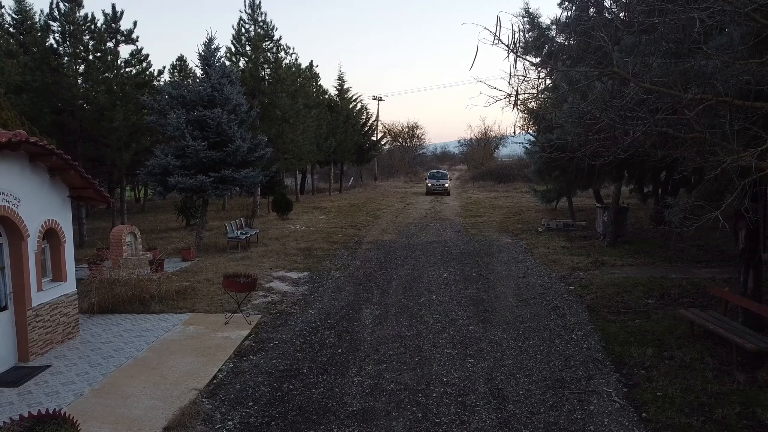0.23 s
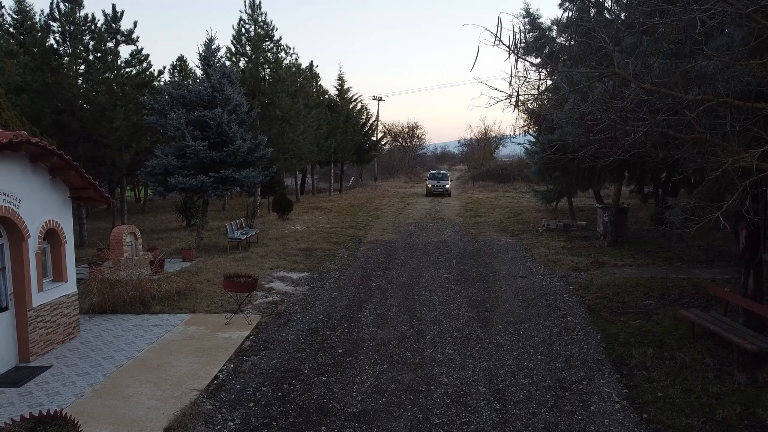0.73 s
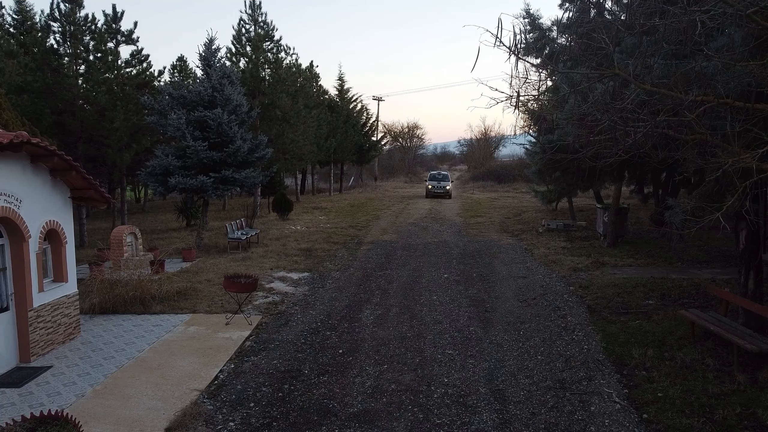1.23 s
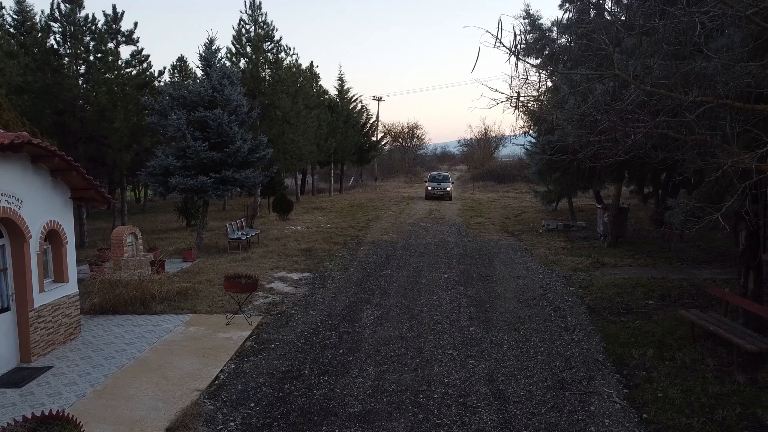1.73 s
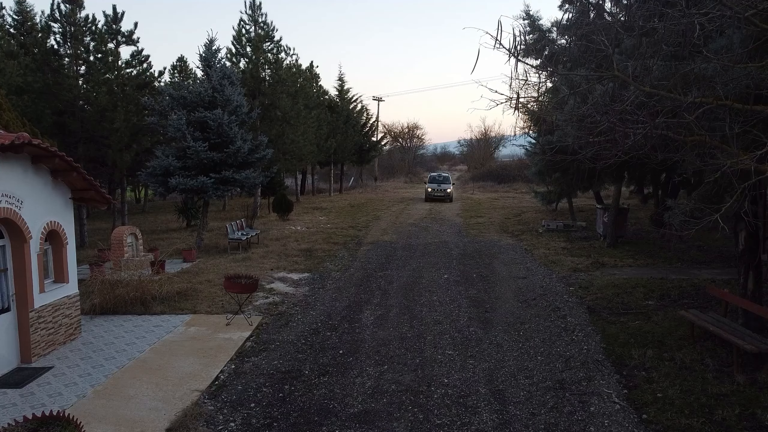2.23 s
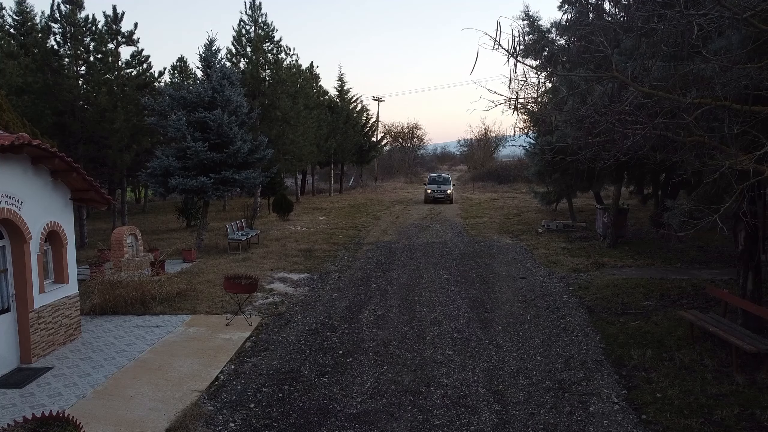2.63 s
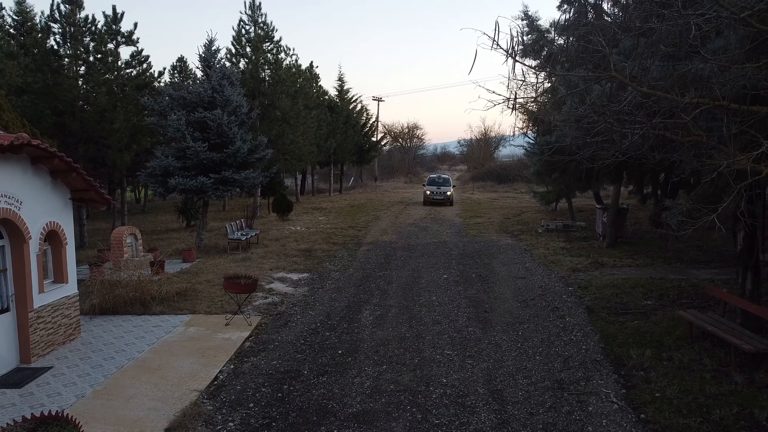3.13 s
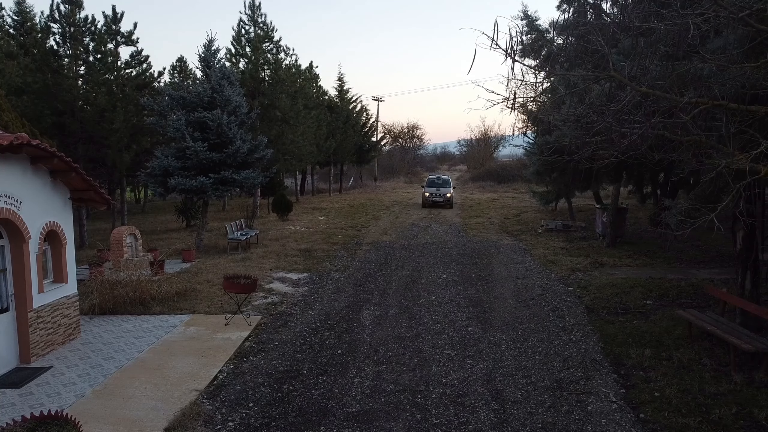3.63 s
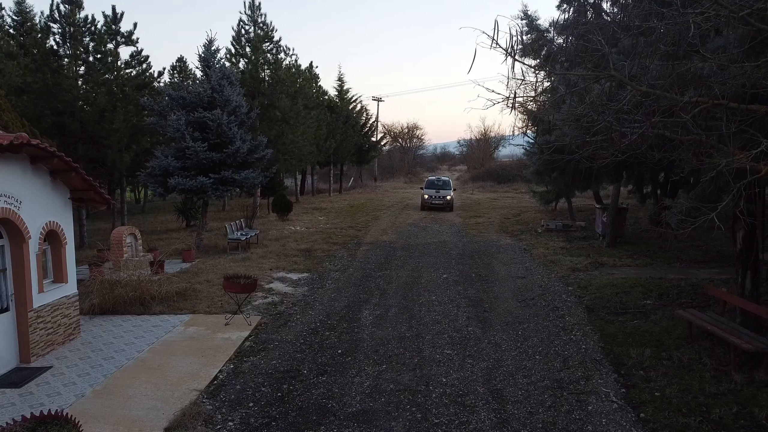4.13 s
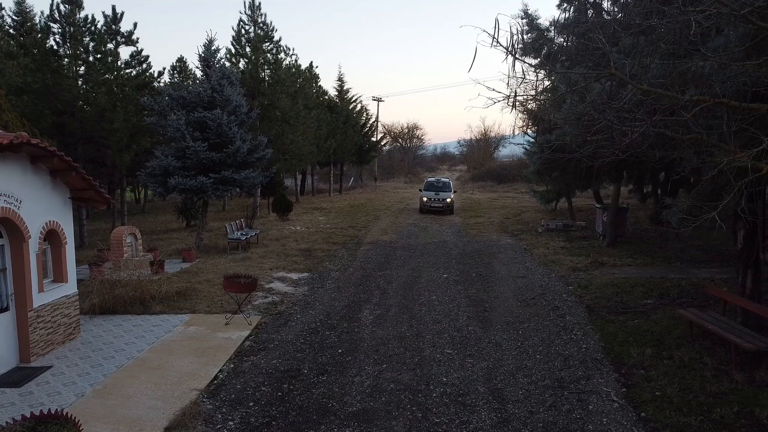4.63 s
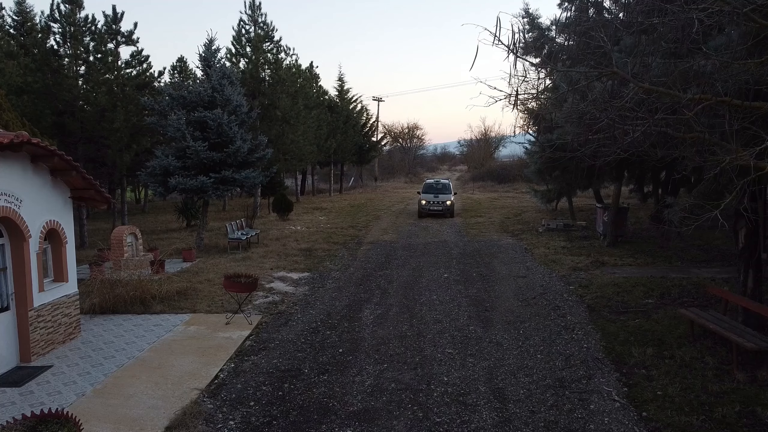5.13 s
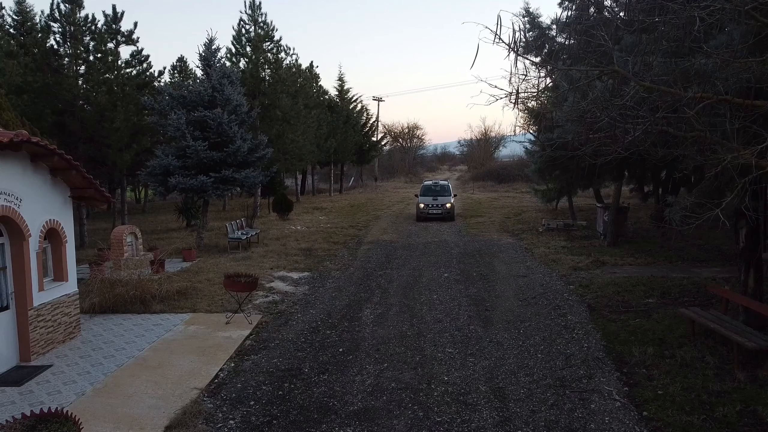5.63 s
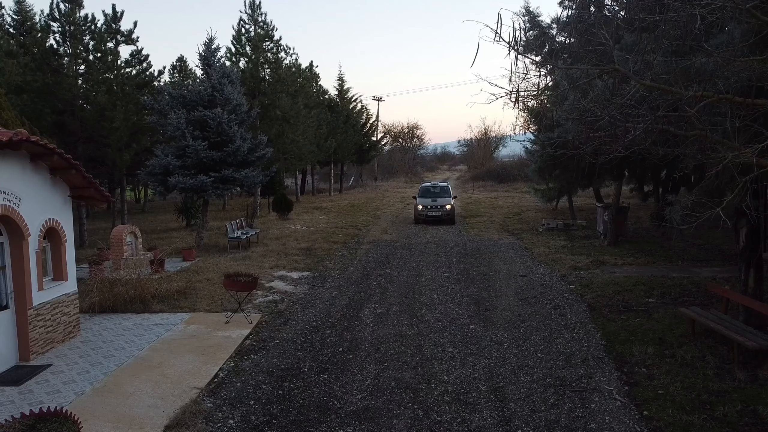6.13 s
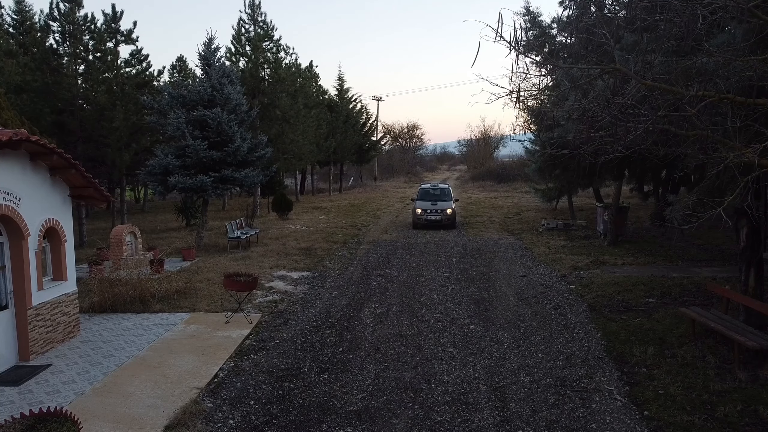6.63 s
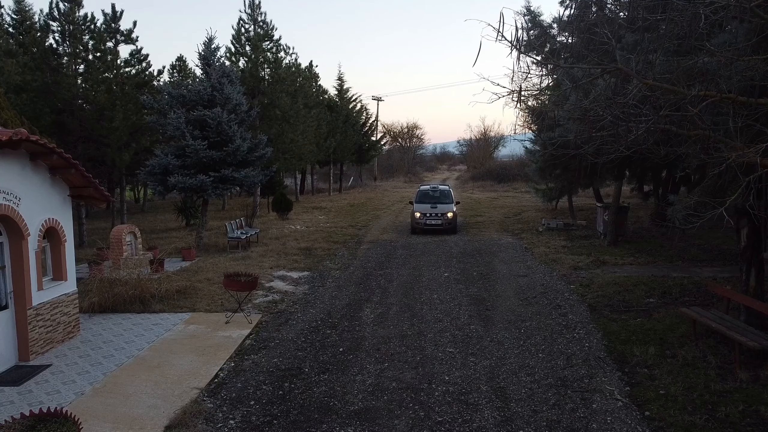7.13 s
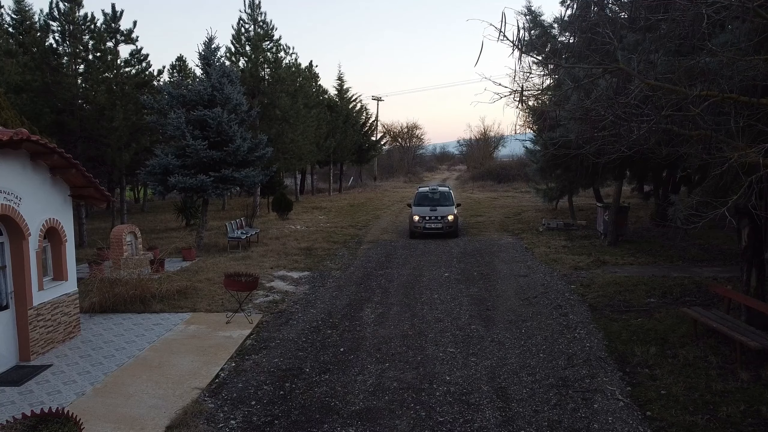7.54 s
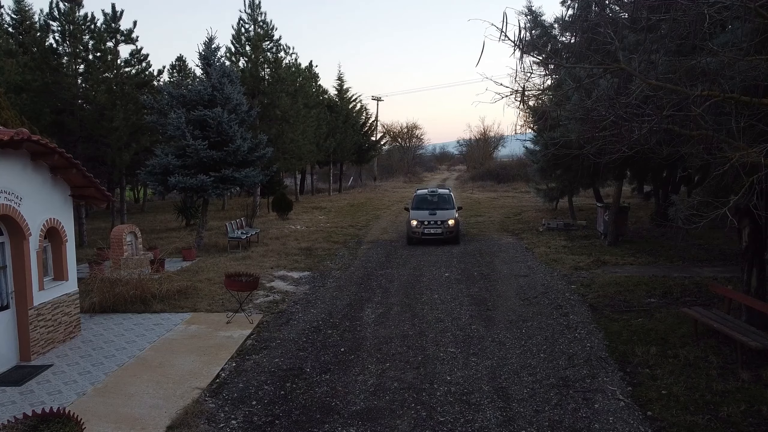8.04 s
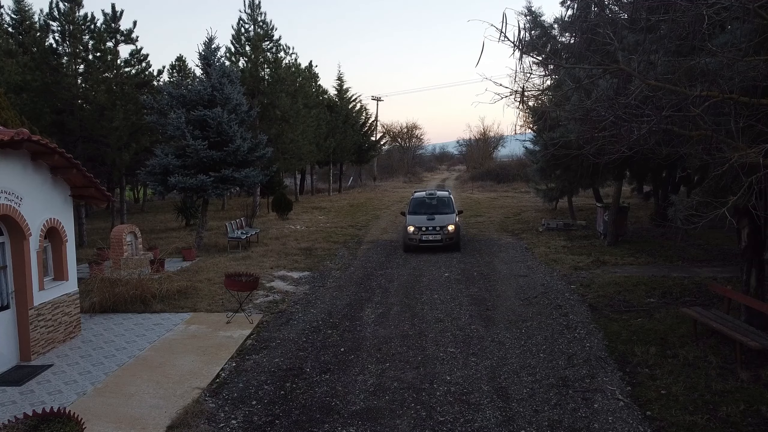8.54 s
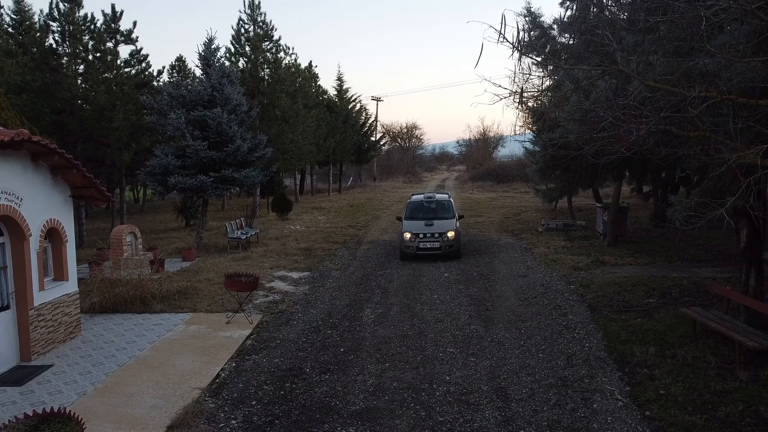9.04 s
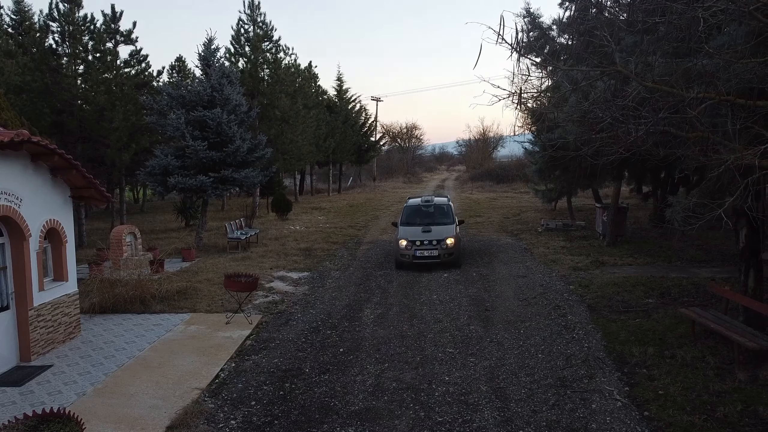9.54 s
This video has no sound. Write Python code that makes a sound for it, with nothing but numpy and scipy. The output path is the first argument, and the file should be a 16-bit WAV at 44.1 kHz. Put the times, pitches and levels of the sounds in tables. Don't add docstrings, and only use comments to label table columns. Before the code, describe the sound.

Tyres crush and pop stones on a gravel track with a throbbing low exhaust drone, easing to a halt before a brief close idle.

```python
import sys
import numpy as np
from scipy import signal
from scipy.io import wavfile
from scipy.ndimage import uniform_filter1d

SR = 44100
rng = np.random.default_rng(int(sys.argv[2]) if len(sys.argv) > 2 else 0)


def wrap_up_sound(samples):
    columns = np.atleast_2d(samples).T
    tamed = np.clip(columns, -1, 1)
    steps = np.round(tamed * 32767).astype(np.int16)
    wavfile.write(sys.argv[1], SR, steps)


def field_ratio(decibels):
    return 10 ** (np.asarray(decibels, dtype=float) / 20)


N = 430857
TIME = np.arange(N) / SR
CUT_S = 9.3133
FULL_DB = -34


def evened(x):
    return x / np.sqrt(np.mean(x ** 2) + 1e-20)


def noise():
    return rng.standard_normal(N)


def curve(rows):
    s, *columns = np.transpose(rows)
    return [np.interp(TIME, s, c) for c in columns]


def by_scene(far_db, near_db):
    return np.where(TIME < CUT_S, far_db, near_db)


def swells(rows):
    return sum(height * np.exp(-((TIME - s) / half) ** 2) for s, half, height in rows)


def add(mix, s, sound):
    part = mix[round(s * SR):][:len(sound)]
    part += sound[:len(part)]


def band(x, hz, width):
    edges = [max(hz - width / 2, 50), min(hz + width / 2, .45 * SR)]
    return signal.lfilter(*signal.butter(2, edges, "bandpass", fs=SR), x)


def colour(x, points):
    f, db = np.transpose(points)
    hz = abs(np.fft.fftfreq(8192, 1 / SR))
    log_gain = np.log(field_ratio(np.interp(np.log(hz + 1), np.log(f + 1), np.maximum(db, -100))))
    taps = np.fft.ifft(np.exp(np.conj(signal.hilbert(log_gain)))).real[:4096]
    if abs(taps[:200]).sum() < abs(taps[-200:]).sum():
        taps = taps[::-1]
    return evened(signal.oaconvolve(x, taps)[:N])


def drift(seconds):
    size = max(round(seconds * SR), 1)
    return evened(uniform_filter1d(uniform_filter1d(noise(), size), size))


def grains(per_s, spread_db, tail_s, bed, clump_db):
    size = field_ratio(spread_db * np.minimum(rng.exponential(1, N), 3.8)) * (rng.random(N) < per_s / SR)
    fall = np.exp(-1 / (max(tail_s, 1e-4) * SR))
    bursts = np.sqrt(signal.lfilter([1], [1, -fall], size ** 2)) * noise()
    clumps_db = clump_db * (drift(0.034) + 0.84 * drift(0.063))
    return (evened(bursts) + bed * noise()) * field_ratio(clumps_db)


def knock(hz, width, t60, blow, chance):
    t = np.arange(len(chance)) / SR
    push = chance * field_ratio(-60 * t / t60) + blow * (t == 0)
    sound = band(band(push, hz, width), hz, 1.57 * width)
    return sound / abs(sound).max()


# hz, level_db (per Hz)
TYRE_COLOUR = [(120, -30), (200, 4), (282, -1.5), (402, -3.5), (482, 1.5), (680, -6.5), (1020, -3.5),
               (1140, -7.5), (1570, -9), (1770, -17.5), (2600, -17.5), (3380, -40), (5720, -120)]


def crush(level_db):
    total = 0
    for hz in (350, 800, 1900):
        clicks = grains(per_s=170, spread_db=2.5, tail_s=0.0054, bed=0.52, clump_db=1.08)
        total = total + evened(band(clicks, hz, 1.2 * hz)) * np.sqrt(hz)
    return field_ratio(level_db - 0.5) * colour(total, TYRE_COLOUR)


# hz, level_db (per Hz)
GRIT_COLOUR = [(940, -19.5), (1600, -4.5), (1760, -8), (2980, -11), (7270, -23.5), (9880, -29.5),
               (10800, -31), (12700, -33), (15800, -48)]
# centre_hz, size_spread_db, bed (ratio to the clicks)
GRIT_SIZES = [
    (2400, 1.6, 1.6),
    (4170, 4.5, 1.13),
    (10000, 4, 1.45),
]


def grit(level_db):
    total = 60 * evened(band(noise(), 19000, 4500))
    for hz, spread_db, bed in GRIT_SIZES:
        clicks = grains(per_s=190, spread_db=spread_db, tail_s=0.0011, bed=bed, clump_db=1)
        total += evened(band(clicks, hz, 1.06 * hz)) * np.sqrt(hz)
    return field_ratio(level_db + 3) * colour(total, GRIT_COLOUR)


# hz, level_db (per Hz)
RUMBLE_COLOUR = [(15, -40), (28, -14), (45, -10), (65, -4.5), (103, -6.5), (156, -4.5), (230, -17),
                 (400, -15), (520, -44), (880, -100)]


def rumble(level_db):
    return field_ratio(level_db + 2.5) * colour(noise(), RUMBLE_COLOUR)


# time_s, crush_db, extra_grit_db
ROLL = [(0, -41.5, 2.5), (.55, -34.5, -1.5), (1.1, -36.5, 2.5), (1.4, -29.5, -4), (1.8, -31, -2.5),
        (2.4, -30.5, 1), (2.95, -35, 1.5), (3.5, -35, 2.5), (4.4, -33.5, 0), (4.84, -36, 0.5),
        (5.5, -37, 2), (6.2, -34.5, -2), (6.9, -33.5, 1), (7.5, -37, -1.5), (8.2, -42, -0.5),
        (8.55, -54, -4), (8.95, -58.5, 4), (9.3, -72, 3)]
# start_s (centre), half_length_s, extra_grit_db
SCRUNCHES = [(0.336, 0.033, 1), (0.636, .04, 2), (1.422, 0.024, 4), (1.68, 0.025, 4), (1.975, 0.034, 1.5),
             (2.118, .04, 2.5), (2.684, 0.016, 3.5), (2.907, 0.031, 6), (3.003, .015, 5.5),
             (3.123, .02, 2.5), (3.514, 0.045, 2), (3.59, 0.013, 7), (4.122, 0.015, 0.5), (4.216, 0.017, 1),
             (4.665, .02, 4), (5.49, .015, 3.5), (5.556, .035, 5.5), (5.73, 0.018, 4), (5.787, 0.0083, 1),
             (6.13, 0.028, 7.5), (6.22, 0.026, 6), (6.36, .02, 3.5), (6.49, 0.02, 2.5), (6.834, 0.034, 1.5),
             (6.99, 0.021, 4.5), (7.075, 0.028, 3.5), (7.245, .02, 4), (7.332, .012, 3.5),
             (7.46, 0.019, 2.5), (8.21, .015, 1.5), (8.43, 0.068, 5), (8.9, .08, 6), (9.1, .05, 6),
             (9.36, .03, 3), (9.64, .02, 3)]


def gravel():
    weight_db, extra_grit_db = curve(ROLL)
    engine_db = curve(ENGINE)[1]
    since = np.maximum(TIME - CUT_S, 0)
    crush_db = by_scene(weight_db, -48 + 7.5 * np.exp(-since / 0.055))
    grit_db = by_scene(-49.5 + (weight_db - FULL_DB) + extra_grit_db, -58)
    rumble_db = by_scene(-40 + 0.74 * engine_db, -49 - 2 * np.exp(-since / 0.1))
    loose_db = swells(SCRUNCHES)
    return crush(crush_db + 0.36 * loose_db) + grit(grit_db + loose_db - 0.88) + rumble(rumble_db)


CHIP_UNDER_EDGE_DB, EDGE_LIFT_DB = -14.5, 0.5

# start_s, peak_db, depth_db, edge_db
POPS = [(0.448, -14.5, -29, -16), (0.606, -11.5, -25, -21), (0.648, -19, -24, -11),
        (0.691, -16.5, -12, -8.5), (0.777, -15.5, -21, -31), (1.204, -30, -3, -17),
        (1.328, -16.5, -22, -13), (1.348, -19, -17, -10), (1.488, -6, -7.5, -39), (1.744, -18.5, -24, -18),
        (1.82, -9.5, -8, -34), (1.989, -16.5, -11, -27), (2.111, -15, -9, -13), (2.12, -19, -6, -11),
        (2.151, -16, -7, -24), (2.19, -17, -25, -17), (2.273, -16, -6, -19), (2.324, -14, -19, -23),
        (2.392, -16.5, -18, -10), (2.44, -18, -2.5, -24), (3.17, -14.5, -1, -8), (3.675, -17, -16, -24),
        (4.073, -19.5, -4.5, -28), (4.361, -12, -19, -12), (4.381, -8, -17, -8.5),
        (4.397, -8, -10.5, -10.5), (4.414, -15, -4.5, -16), (4.689, -14.5, -9, -13.5),
        (6.142, -20, -19, -17), (6.915, -19, -23, -19)]


def pops():
    return [(s, db + deep, db, db + edge + EDGE_LIFT_DB, db + edge + CHIP_UNDER_EDGE_DB)
            for s, db, deep, edge in POPS]


# start_s, peak_db, edge_db
TAPS = [(0.465, -23, -21), (0.656, -23, -11), (1.195, -20, -14), (1.659, -19, -17), (2.382, -18, -7),
        (3.008, -22, -4), (3.548, -18.5, -13), (3.716, -19.5, -8), (3.837, -21, -25), (4.1, -20, -20),
        (4.419, -16, -17), (4.717, -19.5, -21), (5.342, -21, -20), (5.565, -20, -20), (6.12, -20.5, -17),
        (6.16, -22.5, -10), (6.206, -20, -19), (6.498, -22, -19), (6.628, -22, -8), (7.053, -20, -13),
        (7.081, -22, -13), (7.111, -19, -10), (7.367, -25, -19), (7.55, -33, -34), (7.601, -26.5, -9),
        (8.262, -30, -10), (8.3, -36, -20), (8.343, -32.5, -12), (8.611, -40, -14), (9.378, -31, -5)]


def taps():
    return [(s, db - 18, db, db + edge, db + edge + CHIP_UNDER_EDGE_DB) for s, db, edge in TAPS]


# start_s, peak_db, shrillness_db, tread_db
CRACKS = [(0.1254, -30.5, -12, 4), (0.4968, -34.5, -1, -3), (1.1772, -24.5, -14, 0),
          (1.4401, -32.5, -22, 12), (1.8946, -36, -14, -5), (2.0991, -28, -24, 7), (2.1984, -32, -20, 3),
          (2.5626, -22, -24, -10), (2.7003, -23, -17, 3), (2.9946, -30, 1, -2), (3.5808, -25.5, -7.5, -3),
          (3.8531, -21, -21, -14), (4.3884, -17.5, -31, 5), (4.4328, -25, -13, -1), (4.6748, -33, 0, 8),
          (4.8683, -25.5, -11, -2), (4.9024, -35, -1, 7), (4.9664, -45.5, 14, -2), (5.0654, -44, 9, -4),
          (5.1487, -30.5, -15, 3), (5.7114, -30.5, -6.5, 5), (6.3704, -35, -14, 11), (6.6443, -23, -12, 1),
          (6.6554, -34, -6, 3), (6.8034, -30, -8, 7.5), (7.2334, -45.5, 1, -6), (7.3307, -29.5, -13, 2),
          (7.7228, -34, -27, -2), (7.9768, -31, -17, -14), (8.1833, -33, -16, -9)]


def cracks():
    return [(s, db - 19, db + tread, db + EDGE_LIFT_DB, db + shrill) for s, db, shrill, tread in CRACKS]


# start_s, peak_db
THUDS = [(0.623, -28), (0.782, -27), (1.833, -40), (2.304, -22), (3.158, -20), (4.499, -17.5), (5.265, -26),
         (6.116, -27), (7.201, -24.5), (7.283, -28), (7.564, -26), (7.701, -27)]


def thuds():
    return [(s, db, db - 6, db - 20, db - 20 + CHIP_UNDER_EDGE_DB) for s, db in THUDS]


# pitch_hz, width_hz, rattle_t60_s, blow (ratio over the rattle)
RINGS = [
    (503.5, 107, 0.056, 23),
    (1010, 810, 0.12, 16.4),
    (2750, 1520, 0.052, 15.2),
    (5560, 3200, 0.081, 8.5),
]


def stones():
    out = np.zeros((2, N))
    rings = RINGS + [(12000, 4600, .012, 8), (291, 230, 0.091, 48)]
    rows = pops() + taps() + cracks() + thuds()
    for (s, *levels_db), chance in zip(rows, rng.standard_normal((len(rows), 3200))):
        size = 1 + 0.035 * np.clip(chance[-1], -2, 2)
        aside = np.clip(chance[-2], -1, 1)
        sizzle_db, carcass_db = levels_db[-1] - 15, levels_db[0] - 5
        for db, (hz, *ring) in zip(levels_db + [sizzle_db, carcass_db], rings):
            if db < -54:
                continue
            sound = field_ratio(db - 0.57) * knock(hz * size, *ring, chance)
            add(out[0], s, sound)
            add(out[1], s, aside * min(hz / 14000, 1) * sound)
    return out


def thrown(rows, width, t60, blow, lift_db):
    out = np.zeros((2, N))
    for (s, db, hz), chance in zip(rows, rng.standard_normal((len(rows), 2000))):
        sound = field_ratio(db + lift_db) * knock(hz, width * hz, t60, blow, chance)
        add(out[0], s, sound)
        add(out[1], s, 0.11 * np.clip(chance[-1], -1, 1) * sound)
    return out


# start_s, peak_db, pitch_hz
PEBBLES = [(0.309, -24, 974), (0.377, -22, 972), (0.929, -39, 970), (1.307, -22, 1320), (1.404, -14.5, 477),
           (1.499, -16, 487), (1.631, -30, 1070), (1.682, -19, 480), (1.77, -20, 1030), (1.977, -14.5, 961),
           (2.049, -20, 633), (2.521, -21, 942), (2.583, -28, 452), (2.609, -18.5, 934), (2.678, -20, 1520),
           (2.807, -26, 937), (2.867, -22, 724), (3.228, -22, 956), (3.39, -22, 1040), (3.52, -24, 1080),
           (3.66, -18, 977), (3.78, -18, 1130), (3.824, -20, 1020), (4.025, -28, 1300),
           (4.076, -13.5, 1010), (4.215, -20, 625), (4.292, -16, 506), (4.318, -20, 727), (4.473, -19, 517),
           (4.565, -28, 630), (4.657, -20, 1090), (4.772, -23, 627), (4.845, -26, 988), (4.985, -29, 977),
           (5.228, -22, 985), (5.268, -22, 546), (5.712, -31, 1560), (5.924, -23, 1160), (6.004, -29, 958),
           (6.767, -26, 1074), (6.786, -19, 1078), (6.902, -26, 1000), (6.958, -24, 974), (7.086, -18, 533),
           (7.138, -28, 452), (8.18, -36, 1020)]


def pebbles():
    return thrown(PEBBLES, width=0.6, t60=0.05, blow=7.3, lift_db=-5)


# start_s, peak_db, pitch_hz
FLAKES = [(0.0762, -36, 2590), (0.3087, -37, 2520), (0.3346, -35, 2450), (0.3805, -33, 2320),
          (0.8999, -40, 2330), (0.9472, -35, 2510), (1.0974, -39, 2490), (1.2351, -32, 2330),
          (1.4047, -29, 2570), (1.5349, -32, 2240), (1.6092, -41, 2380), (1.6641, -33, 2340),
          (1.8382, -29, 2390), (1.9495, -31, 2210), (1.9659, -30, 2570), (2.6653, -30, 2420),
          (2.8464, -37, 2700), (2.8998, -33, 2290), (2.9194, -35, 2700), (2.9507, -32, 2630),
          (3.1088, -33, 2410), (3.2186, -29, 2390), (3.3393, -41, 2280), (3.475, -35, 2460),
          (3.5234, -29, 2620), (3.6616, -37, 2660), (3.9823, -31, 2430), (4.1294, -32, 2240),
          (4.2594, -35, 2930), (4.4752, -26, 2280), (4.586, -25.5, 2300), (4.6533, -33, 3290),
          (4.8888, -30, 2760), (5.2275, -36, 2230), (5.2629, -36, 2520), (5.3048, -40, 2470),
          (5.3976, -35, 3090), (5.4151, -31, 2460), (5.4685, -34, 2380), (5.7733, -39, 2470),
          (6.0746, -31, 2390), (6.2981, -29.5, 2300), (6.4487, -38, 2280), (6.5385, -32, 2480),
          (6.7206, -30, 2640), (6.9566, -30, 2270), (7.202, -39, 2380), (7.7583, -34, 2750),
          (8.0287, -33, 2540), (8.3789, -41, 2450), (8.8294, -50, 2300), (8.8817, -46, 2280),
          (8.9216, -53, 2310), (8.9594, -54, 2310), (9.3894, -37, 2450), (9.6385, -45, 2940)]


def flakes():
    return thrown(FLAKES, width=0.8, t60=0.052, blow=6.5, lift_db=-4)


# start_s, peak_db, pitch_hz
SPLINTERS = [(0.4479, -41, 4120), (0.4968, -41, 4300), (0.5796, -34, 3950), (1.3488, -27.5, 3690),
             (1.8951, -27.5, 4640), (2.0014, -33, 3530), (2.165, -32, 3870), (2.3865, -30, 3550),
             (2.7006, -28, 3790), (2.9946, -39, 3650), (3.1702, -17.5, 3606), (3.5808, -42, 3590),
             (3.9424, -35, 3580), (4.0243, -37, 3684), (4.3615, -38, 4080), (4.4323, -32, 4190),
             (4.6738, -31, 3830), (4.8678, -32, 3800), (4.9661, -38, 5180), (5.0648, -22, 5230),
             (5.1489, -24.5, 3560), (5.5548, -39, 4320), (5.7059, -40, 4630), (6.5859, -35, 5210),
             (6.6438, -24, 3600), (6.765, -28, 3715), (6.8049, -41, 3580), (7.0529, -35, 3660),
             (7.233, -37, 4570), (7.3307, -32, 3830)]


def splinters():
    return thrown(SPLINTERS, width=0.52, t60=0.018, blow=9, lift_db=0.3)


# start_s, peak_db, pitch_hz
SAND = [(0.628, -41, 5740), (0.819, -42, 5620), (1.1702, -38, 7420), (1.4965, -39, 5680),
        (2.0014, -35, 5890), (2.1894, -38, 5600), (2.3042, -38, 5950), (2.608, -35, 6260),
        (2.7985, -34, 5740), (2.8858, -38, 7030), (2.9094, -38, 5500), (3.009, -30, 5960),
        (3.1702, -32, 10400), (3.4752, -38, 5570), (3.582, -30, 6350), (3.716, -36, 5850),
        (3.9818, -42, 5780), (4.2165, -42, 5810), (4.6563, -39, 6830), (4.6887, -38, 7400),
        (5.0519, -30, 5940), (5.4859, -34, 5740), (6.3475, -39, 5680), (6.8494, -43, 6140),
        (6.9794, -43, 5640), (7.0804, -31, 5580), (7.2494, -42, 5510), (7.2848, -41, 6260),
        (7.5477, -48, 6080), (7.5842, -38, 5850), (7.6974, -45, 7450), (8.0012, -44, 5680),
        (8.2067, -47, 5660), (8.3, -48, 6680), (8.3494, -58, 6930), (9.3494, -49, 10900),
        (9.5294, -54, 7190), (9.6394, -50, 10900)]


def sand():
    return thrown(SAND, width=0.8, t60=0.052, blow=6.5, lift_db=-2)


# time_s, firing_hz, level_db
ENGINE = [(0, 48.15, -8.5), (.65, 46.63, -1), (1.4, 45.37, 0), (2, 44.28, 0), (2.5, 41.68, 0.5),
          (3, 40.74, -0.5), (3.5, 38.96, -1), (4, 38.33, 0.5), (6.7, 38.8, -0.5), (7.3, 38.65, -2),
          (7.9, 38.85, -9), (8.7, 38.4, -19), (9.3, 39, -25)]
# hz, level_db
PIPE = [(38, -47.5), (46, -36.5), (77, -45), (93, -48.5), (116, -83), (137, -44), (155, -32), (190, -37.5)]
TURNS = [1.93, 2.12, 2.45, 2.67, 2.96, 3.33, 3.55, 3.88, 4.18, 4.48, 4.76, 5.14, 5.43, 5.75, 6.12, 6.47,
         6.79, 7.23, 7.65, 8.07, 8.32, 8.68]


def passing_engine():
    hz, level_db = curve(ENGINE)
    pipe_hz, pipe_db = np.transpose(PIPE)
    turn = 2 * np.pi * np.cumsum(hz) / SR
    hum = 0
    for k in (1, 2, 3):
        hum = hum + field_ratio(np.interp(k * hz, pipe_hz, pipe_db)) * np.sin(k * (turn + 1.24))
    wheel = np.sin(np.pi * np.interp(TIME, TURNS, np.arange(len(TURNS))))
    throb = np.sign(wheel) * abs(wheel) ** 0.84
    depth = (1 - 0.021) * np.clip((TIME - 1.84) / 0.24, 0, 1)
    early_hz, early_s = 5.06, 0.899
    slip = 0.6055 * TIME - early_hz * early_s * np.exp(-TIME / early_s)
    drone = np.sin(4 * turn + 2 * np.pi * slip)
    hum += field_ratio(np.interp(4 * hz, pipe_hz, pipe_db)) * (1 - depth + depth * throb) * drone
    return np.sqrt(2) * field_ratio(level_db) * hum * np.clip((8.8 - TIME) / 0.3, 0, 1)


# hz, level_db
IDLE = [(35, -53), (70, -45), (104, -48), (140, -47), (173, -46.5), (209, -57)]


def idling_engine():
    orders = sum(field_ratio(db) * np.sin(2 * np.pi * f * TIME + 0.72 * f) for f, db in IDLE)
    return np.sqrt(2) * field_ratio(drift(0.064)) * orders * (TIME > CUT_S)


# start_s, length_s, level_db
SQUEAKS = [
    (4.204, .1, -77),
    (5.05, 0.21, -66),
    (9.335, .16, -74),
    (9.535, .3, -74),
]


def brake_squeak():
    high_hz, low_hz, edge_s = 10853, 5211, .025
    pressed = 0
    for s, length, db in SQUEAKS:
        inside_s = np.minimum(TIME - s, s + length - TIME)
        pressed = pressed + field_ratio(db) * np.clip(inside_s / edge_s + .5, 0, 1) ** 2
    rough = .4 * evened(band(noise(), low_hz, 250))
    low = np.sin(2 * np.pi * low_hz * TIME) + rough
    low_gain = 1.4 * np.clip((TIME - 9.5) / .08, .8 * (TIME > CUT_S), 1)
    tone = np.sin(2 * np.pi * high_hz * TIME) + low_gain * low
    return np.sqrt(2) * pressed * field_ratio(1.36 * drift(.01)) * tone


# start_s (centre), half_length_s, level_db
RUBS = [
    (0, 0.11, -66),
    (4.23, .07, -63),
    (5.9, 0.95, -76),
    (6.83, .13, -69),
]


def brake_rustle():
    weight_db = curve(ROLL)[0]
    rubbing = field_ratio(by_scene(-73 + 0.34 * (weight_db - FULL_DB), -73))
    rubbing = rubbing + swells([(s, half, field_ratio(db)) for s, half, db in RUBS])
    return field_ratio(-3.5) * rubbing * evened(band(noise(), 10870, 740))


# hz, level_db
WHINES = [(15464, -95), (15676, -87)]


def electric_whine():
    lift_db = 7 * (TIME > CUT_S)
    return np.sqrt(2) * sum(field_ratio(db + lift_db) * np.sin(2 * np.pi * f * TIME) for f, db in WHINES)


# hz, level_db (per Hz)
WIND_COLOUR = [(15, -40), (25, -14), (84, 0.5), (157, -1.5), (361, -8), (1010, -22.5), (1640, -23),
               (3780, -37.5), (5670, -37.5), (7420, -46), (15800, -52)]


def wind():
    return field_ratio(-44.5 + 2.4 * drift(0.13)) * colour(noise(), WIND_COLOUR)


# hz, level_db (per Hz)
AIR_COLOUR = [(24, -40), (40, -2), (158, 6), (431, -7), (596, -15.5), (1750, -22), (3890, -34),
              (9340, -33.5), (11400, -38), (13300, -34.5), (15800, -33)]


def garden_air():
    hush_db = 3.3 * np.exp(-((TIME - 8.67) / 0.096) ** 2)
    return field_ratio(-43.5 - 2.5 - hush_db) * colour(noise(), AIR_COLOUR)


def scene():
    hits, hits_aside = stones() + pebbles() + flakes() + splinters() + sand()
    middle = gravel() + hits + passing_engine() + idling_engine()
    middle += brake_squeak() + brake_rustle() + electric_whine() + garden_air()
    side = wind() + hits_aside
    side += 0.055 * np.roll(middle, 150)
    side += 0.22 * band(np.roll(middle, 43), 5000, 2400)
    side -= 0.3 * band(middle, 12500, 7000)
    return np.array([middle + side, middle - side])


def band_limit(x):
    return signal.sosfilt(signal.butter(12, 16310, fs=SR, output="sos"), x)


def record(dry):
    lowpass = signal.firwin(511, 15790, window=("kaiser", 9), fs=SR)
    limited = signal.oaconvolve(dry, lowpass[None], "same")
    return band_limit(limited)


dry = scene()
out = record(dry)
wrap_up_sound(out)
```